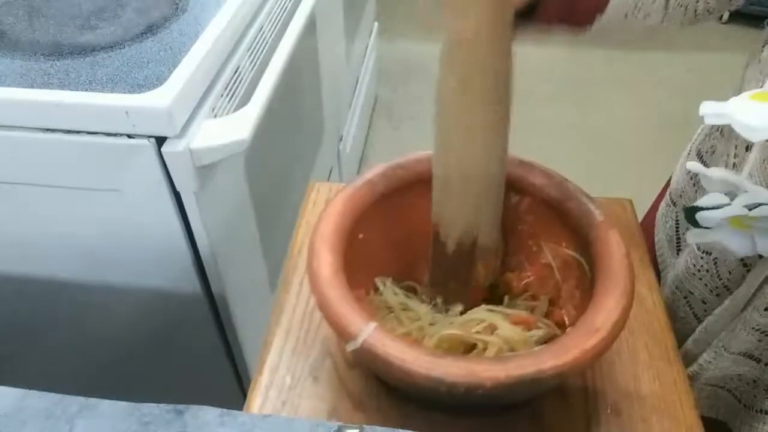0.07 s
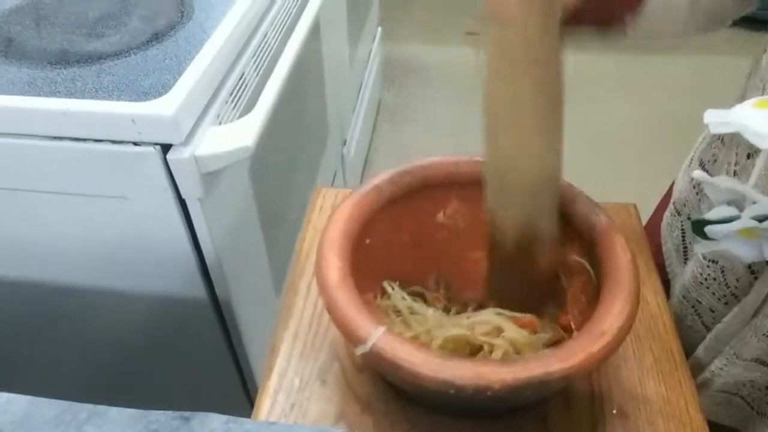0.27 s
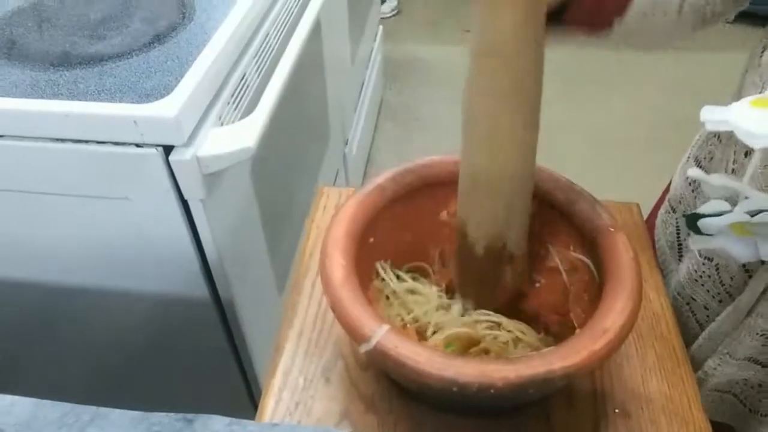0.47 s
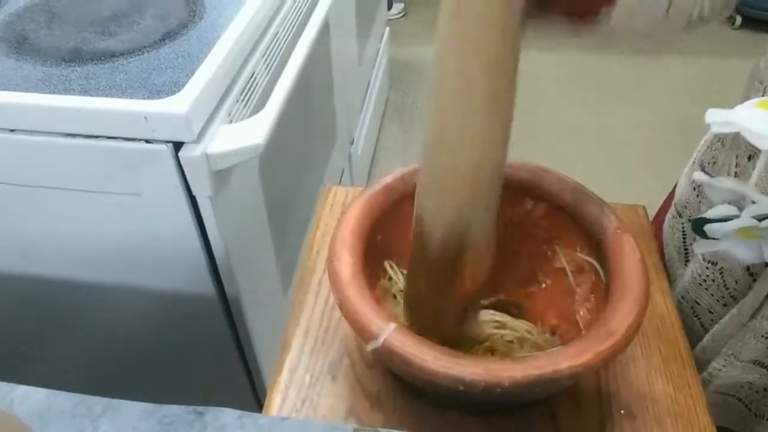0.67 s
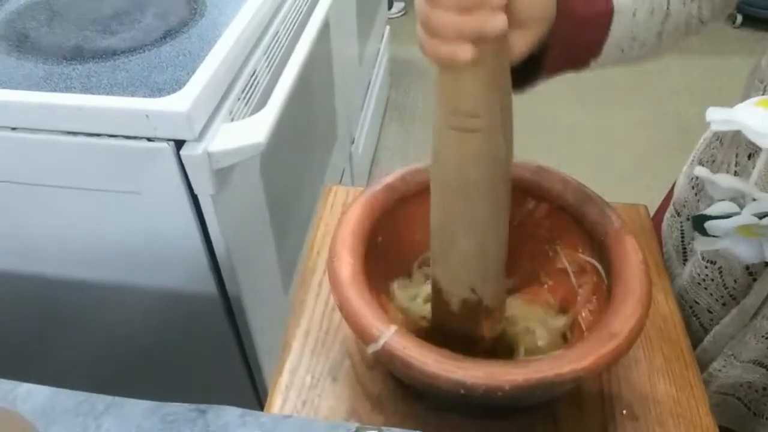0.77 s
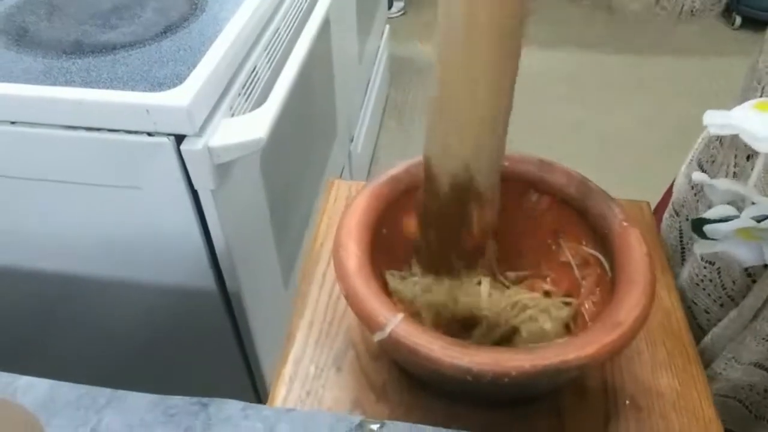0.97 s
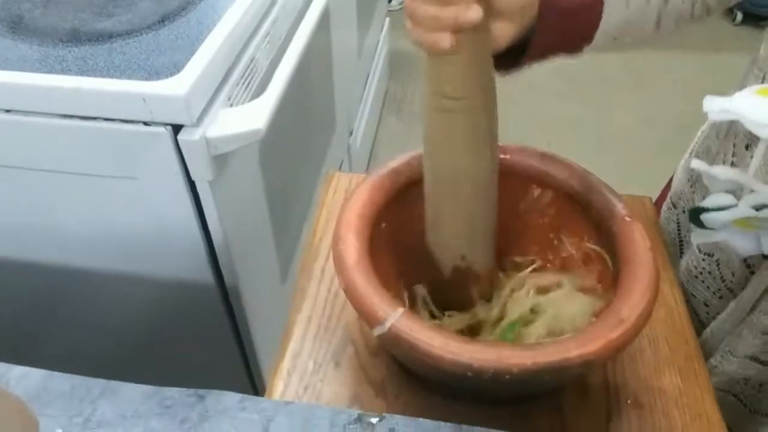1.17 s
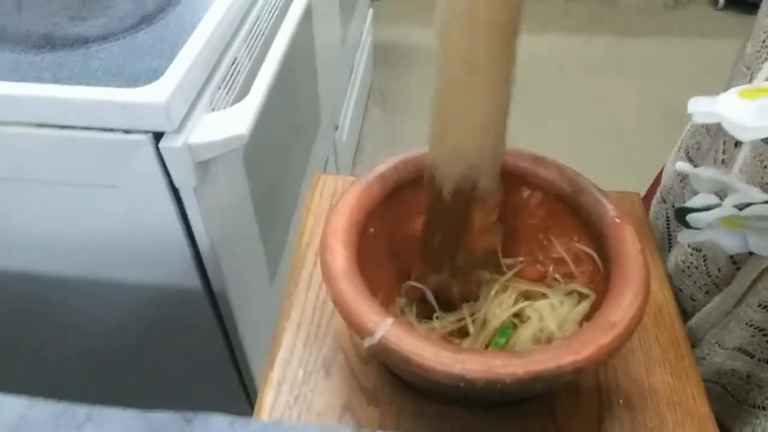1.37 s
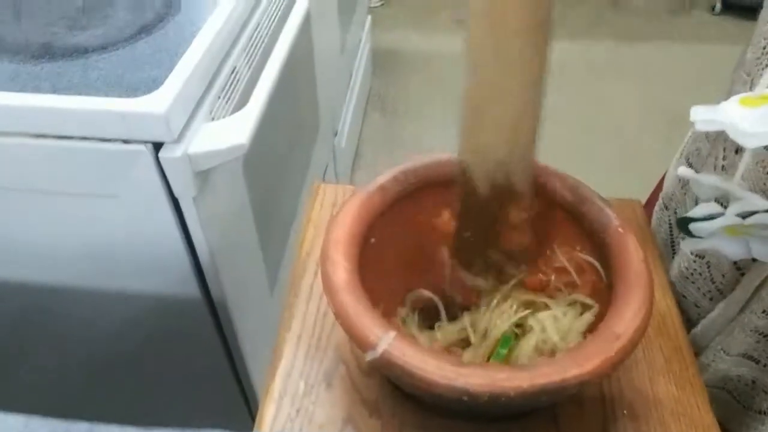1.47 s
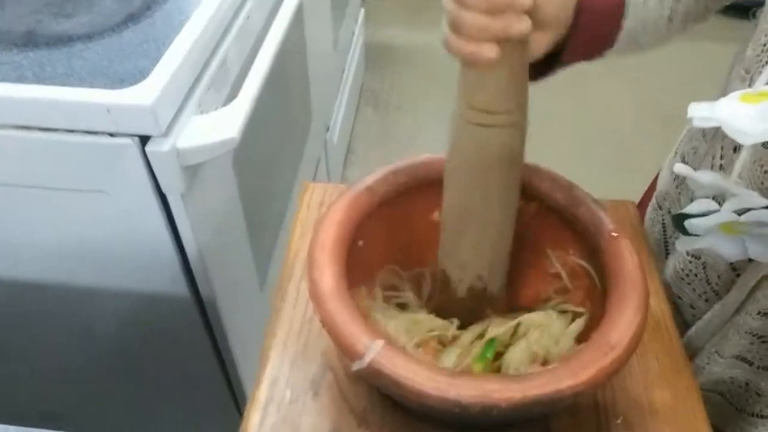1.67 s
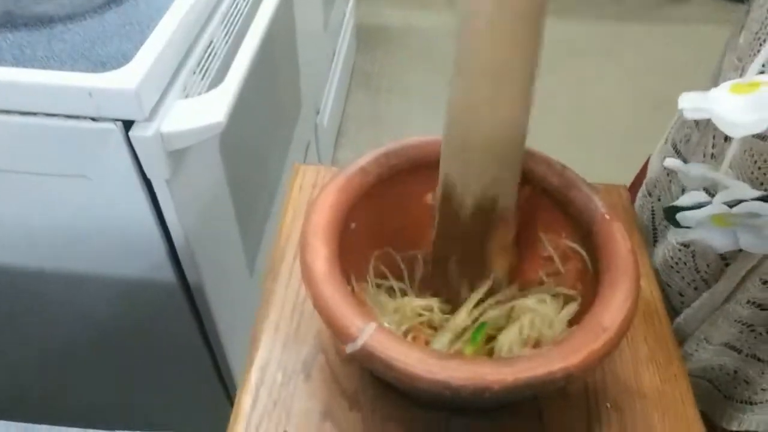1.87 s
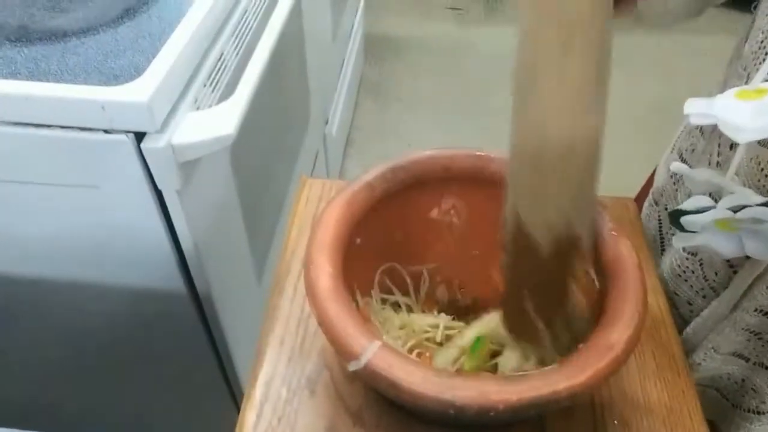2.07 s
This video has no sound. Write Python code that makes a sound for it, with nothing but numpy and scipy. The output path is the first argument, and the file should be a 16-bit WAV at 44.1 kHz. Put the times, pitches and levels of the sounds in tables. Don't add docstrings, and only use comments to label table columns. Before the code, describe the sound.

A wooden pestle pounds wet shredded papaya in a clay mortar, knocking and ringing in a kitchen

```python
import sys
import numpy as np
from scipy import signal
from scipy.fft import rfft, irfft
from scipy.io import wavfile
from scipy.ndimage import uniform_filter1d

SR = 44100
rng = np.random.default_rng(int(sys.argv[2]) if len(sys.argv) > 2 else 0)


def inscribe(sig):
    pcm = np.round(np.clip(np.atleast_2d(sig).T, -1, 1) * 32767)
    wavfile.write(sys.argv[1], SR, pcm.astype(np.int16))


def invert_db(level):
    return 10 ** (np.asarray(level, dtype=float) / 20)


N = 93844

# time in [s], level in [dB].
HISS_LEVELS = [(0, -55), (.18, -63), (.26, -69), (.39, -74), (.41, -56), (.57, -63), (.72, -73), (.82, -72),
               (.86, -57), (.93, -63), (1.02, -61), (1.2, -73), (1.23, -49), (1.38, -48), (1.54, -56),
               (1.58, -50), (1.98, -47), (2.13, -62)]
# frequency in [Hz], density in [dB per Hz].
HISS_COLOUR = [(880, 5), (1500, -14), (2420, -6), (2700, -2.5), (5090, 0), (5890, -5), (7900, 4),
               (9700, -12), (15500, -33)]
# frequency in [Hz], density in [dB per Hz].
HUM_COLOUR = [(18, -66), (30, -31), (142, -5), (257, -3), (291, -5), (372, -8), (731, -8), (935, -13),
              (4000, -28.5), (5200, -54), (8800, -120)]
# start in [s], free ring before the pestle damps the bowl in [s].
BLOWS = [
    (.002, .027),
    (.4035, .035),
    (.835, .02),
    (1.2185, .047),
    (1.6722, .083),
]
# wood knock, bowl tone, rim ting and crack, all in [dB].
LANDINGS = [
    (-24, -23.5, -41.5, -32.5),
    (-25.5, -28.5, -44, -26),
    (-42.5, -46, -53, -27.5),
    (-14.5, -14.5, -43, -18.5),
    (-13.5, -16, -30, -18),
]
# frequency in [Hz], level in [dB], T60 in [s].
WOOD_PARTIALS = [(250, -9.5, 0.13), (330, -6.5, 0.076), (545.6, -3, 0.09), (568, -10, 0.084),
                 (720, -12, 0.067), (852.4, -9.5, 0.1), (1223, 6.5, 0.02), (1334, -9, 0.066),
                 (1410, 6, 0.0072), (1797, -3.5, 0.022), (2100, -7.5, 0.014)]
# frequency in [Hz], level in [dB], T60 in [s].
RIM_PARTIALS = [(2797, 0, .25), (2775, -9, .12), (3625, -10, .05)]
# frequency in [Hz], density in [dB per Hz].
THUD_COLOUR = [(120, -9), (250, -7), (400, -2.5), (560, -7), (900, -5), (1500, -1.5), (2200, -14),
               (4000, -60)]
# frequency in [Hz], density in [dB per Hz].
SNAP_COLOUR = [(710, -1), (1200, -12), (1520, -15.5), (1800, -4), (2680, -5.5), (3650, -6), (3980, -14),
               (7480, -1.5), (15500, -41)]
# start in [s], level in [dB], length in [s].
EASES = [(0.038, -31, 0.026), (0.061, -28.5, 0.066), (0.102, -33.5, 0.064), (0.17, -37.5, 0.026),
         (0.226, -50.5, 0.14), (0.493, -39, 0.039), (1.352, -33, 0.089), (1.467, -42, 0.11),
         (1.587, -52.5, 0.048), (1.866, -34, 0.073), (1.959, -47, 0.093)]
# start in [s], level in [dB], length in [s].
SNAPS = [(.01, -22.5, 0.021), (0.032, -33, 0.037), (0.12, -35, 0.024), (0.139, -31.5, 0.01),
         (.155, -27.5, 0.0027), (0.2, -45, .003), (0.401, -28.5, 0.0077), (0.419, -26.5, 0.012),
         (0.438, -31.5, 0.021), (0.458, -35, 0.038), (0.51, -51, 0.005), (0.563, -41, 0.0081),
         (0.802, -45.5, 0.0091), (0.826, -35.5, 0.018), (0.839, -34, 0.02), (0.858, -37, 0.022),
         (0.942, -42, 0.015), (1.204, -60, .01), (1.253, -32.5, 0.018), (1.56, -56, .04),
         (1.68, -43, 0.013), (1.722, -24, 0.012), (1.74, -33, .012), (1.838, -37, 0.048)]
# start in [s], level in [dB], pitch in [Hz], length in [s].
BUMPS = [(0.027, -23.5, 796, 0.022), (0.015, -27.5, 2100, 0.024), (0.113, -32, 1964, 0.019),
         (0.141, -36.5, 1905, 0.027), (0.104, -33.5, 551, 0.067), (0.138, -33.5, 236, 0.054),
         (.225, -34.5, 241.6, 0.057), (0.267, -25.5, 330, 0.013), (0.278, -32.5, 518, 0.021),
         (.42, -37.5, 117, 0.052), (.47, -32, 616, 0.016), (0.484, -26, 464, 0.033),
         (0.503, -33.5, 567, 0.032), (.933, -35.5, 543, 0.038), (.935, -37.5, 1423, 0.011),
         (1.02, -42, 255, 0.022), (1.3, -36, 172.2, 0.13), (1.384, -36.5, 237, 0.034),
         (1.907, -28, 433, 0.02), (1.94, -24.5, 250, 0.018), (1.678, -20, 720, 0.034),
         (1.85, -36, 1990, 0.028)]
# frequency in [Hz], T60 in [s].
KITCHEN_T60 = [(150, 0.28), (500, 0.57), (1300, 0.9), (2200, 0.59), (9000, 0.089)]

BELL_HZ = 1057.8


def evened(x):
    return x / np.sqrt(np.mean(x ** 2) + 1e-20)


def read(points, hz):
    f, value = np.transpose(points)
    return np.interp(np.log(hz + 1), np.log(f + 1), value)


def add(mix, s, sound):
    part = mix[max(round(s * SR), 0):][:len(sound)]
    part += sound[:len(part)]


def coloured(x, points):
    gain = invert_db(read(points, np.fft.rfftfreq(len(x), 1 / SR)))
    return evened(irfft(rfft(x) * gain, len(x)))


def band(x, hz, width):
    sos = signal.butter(2, [hz / width, hz * width], "band", fs=SR, output="sos")
    return evened(signal.sosfilt(sos, x))


def modes(table, t, turns):
    partials = zip(table, turns)
    return sum(invert_db(db - 60 * t / t60) * np.sin(2 * np.pi * (hz * t + u / 4))
               for (hz, db, t60), u in partials)


def puff(t, length):
    return (1 - np.exp(-8 * t / length)) ** 2 * np.exp(-2.5 * t / length)


def patchy(points):
    patch_db = -0.5
    frames, hz = N // 128 + 5, np.fft.rfftfreq(512, 1 / SR)
    a, b, p = rng.standard_normal((frames, 257, 3)).T
    p = uniform_filter1d(p, size=8, axis=0)
    p = evened(uniform_filter1d(p, size=14, axis=1))
    z = (a + 1j * b) * invert_db(read(points, hz)[:, None] + patch_db * p)
    return evened(signal.istft(z, nperseg=512, noverlap=384)[1][:N])


def hiss(hiss_db):
    grains_per_s, grain_db, spread_db, level_db = 370, -12.5, -2.5, 4.5
    sizes = invert_db(spread_db * np.minimum(rng.exponential(1, N), 5))
    grains = (rng.random(N) < grains_per_s / SR) * rng.standard_normal(N) * sizes
    mixed = evened(patchy(HISS_COLOUR) + invert_db(grain_db) * coloured(grains, HISS_COLOUR))
    return mixed * invert_db(hiss_db + level_db)


def room_hum(hiss_db):
    hum_db, follows, lumps_db = -56.5, 0.38, 2.5
    lumps = lumps_db * evened(uniform_filter1d(rng.standard_normal(N), size=900))
    level_db = hum_db + lumps + follows * (hiss_db - hiss_db.min())
    return coloured(rng.standard_normal(N), HUM_COLOUR) * invert_db(level_db)


def whine():
    hz, width_hz, level_db = 4960, 70, -77
    b, a = signal.iirpeak(hz, hz / width_hz, SR)
    return invert_db(level_db) * evened(signal.lfilter(b, a, rng.standard_normal(N)))


def background():
    hiss_db = np.interp(np.arange(N) / SR, *np.transpose(HISS_LEVELS))
    return hiss(hiss_db) + room_hum(hiss_db) + whine()


def blow(knock_db, rim_db, crack_db, turns, grit, noise):
    thud_db, thud_s = 1, 0.005
    smear_hz, smear_db, smear_t60_s = 1309, -20, 0.63
    crack_s, crunch_s, crunch_db = 0.0021, 0.045, -18.5
    t = np.arange(len(grit)) / SR
    thud = invert_db(thud_db) * coloured(noise, THUD_COLOUR) * np.exp(-t / thud_s)
    smear = invert_db(smear_db - 60 * t / smear_t60_s) * band(noise[::-1], smear_hz, 1.07)
    wood = invert_db(knock_db) * (modes(WOOD_PARTIALS, t, turns) + thud + smear)
    rim = invert_db(rim_db) * modes(RIM_PARTIALS, t, turns)
    crack = invert_db(crack_db) * grit * (np.exp(-t / crack_s) + invert_db(crunch_db) * np.exp(-t / crunch_s))
    contact = np.sin(np.pi / 2 * np.minimum(t / 0.0014, 1)) ** 2
    return (wood + rim) * contact + crack


def pounding():
    lead_s, lead_db = 0.0023, -13.5
    out, grit = np.zeros(N), coloured(rng.standard_normal(N + SR), SNAP_COLOUR)
    turns = rng.random((len(BLOWS), len(WOOD_PARTIALS)))
    noise = rng.standard_normal((len(BLOWS), SR))
    t = np.arange(600) / SR
    squeeze = np.exp(-t / lead_s)[::-1]
    for (s, _), (knock, _, rim, crack), u, n in zip(BLOWS, LANDINGS, turns, noise):
        at = round(s * SR)
        add(out, s, blow(knock, rim, crack, u, grit[at:at + SR], n))
        if at > len(t):
            add(out, s - len(t) / SR, invert_db(crack + lead_db) * squeeze * grit[at - len(t):at])
    return out


def bell(bell_db, free):
    t60_s, swell_s, split_hz, twin_db = 0.98, 0.0011, 14, -16
    damp_db, damp_s = -7, 0.0039
    linger_t60_s, linger_split_hz, linger_twin_db = 0.4, 18.3, 1
    t = np.arange(SR) / SR

    def tone(hz):
        return np.sin(2 * np.pi * hz * t)

    held = 1 / (1 + np.exp(np.clip((t - free) / damp_s * 4, -50, 50)))
    pair = tone(BELL_HZ) - invert_db(twin_db) * tone(BELL_HZ + split_hz)
    clear = held * invert_db(-60 * t / t60_s) * pair
    beating = tone(BELL_HZ) + invert_db(linger_twin_db) * tone(BELL_HZ - linger_split_hz)
    linger = (1 - held) * invert_db(damp_db - 60 * t / linger_t60_s) * beating
    return invert_db(bell_db) * (1 - np.exp(-t / swell_s)) * (clear + linger)


def bowl():
    out = np.zeros(N)
    for (s, free), (_, bell_db, _, _) in zip(BLOWS, LANDINGS):
        add(out, s, bell(bell_db, free))
    for s, db, length in EASES:
        t = np.arange(0, length, 1 / SR)
        add(out, s, invert_db(db) * np.sin(np.pi * t / length) * np.sin(2 * np.pi * BELL_HZ * t))
    return out


def snaps():
    clump_db = 1.8
    out, t = np.zeros(N), np.arange(3000) / SR
    clumps = invert_db(clump_db * rng.exponential(1, N + SR))
    grit = coloured(rng.standard_normal(N + SR) * clumps, SNAP_COLOUR)
    for s, db, length in SNAPS:
        add(out, s, invert_db(db) * puff(t, length) * grit[round(s * SR):][:len(t)])
    return out


def bumps():
    knock_db = -4
    out, t = np.zeros(N), np.arange(6000) / SR
    knock = modes(WOOD_PARTIALS, t, np.zeros(len(WOOD_PARTIALS))) * puff(t, 0.056)
    for s, db, hz, length in BUMPS:
        rough = band(rng.standard_normal(len(t)), hz, 1.47)
        body = (1.1 * np.sin(2 * np.pi * hz * t) + rough) * puff(t, length)
        add(out, s, invert_db(db) * (body + invert_db(knock_db) * knock))
    return out


def kitchen(x):
    taps = np.zeros(SR)
    at = np.arange(200, SR - 20, 20)
    taps[at + rng.integers(0, 20, len(at))] = rng.choice([-1., 1.], len(at))
    hz, t, z = signal.stft(taps, SR, nperseg=256)
    decay = invert_db(-60 * t / read(KITCHEN_T60, hz)[:, None])
    tail = signal.istft(z * decay, SR, nperseg=256)[1]
    return signal.fftconvolve(x, tail / np.linalg.norm(tail))[:N]


def scene():
    echo_db, bell_room_db = -14, -8
    mortar, tone = pounding() + bumps() + snaps(), bowl()
    echo = invert_db(echo_db) * kitchen(mortar + invert_db(bell_room_db) * tone)
    return (mortar + tone + echo + background())[None]


def roll_off(x):
    return signal.sosfilt(signal.butter(12, 16130, fs=SR, output="sos"), x)


def record(dry):
    low_cut_hz, edge_hz = 124, 15600
    low_cut = signal.butter(3, low_cut_hz, "high", fs=SR, output="sos")
    band_limit = signal.ellip(8, 0.5, 60, edge_hz, fs=SR, output="sos")
    mix = signal.sosfilt(band_limit, signal.sosfilt(low_cut, dry))
    return roll_off(mix)


dry = scene()
out = record(dry)
inscribe(out)
```